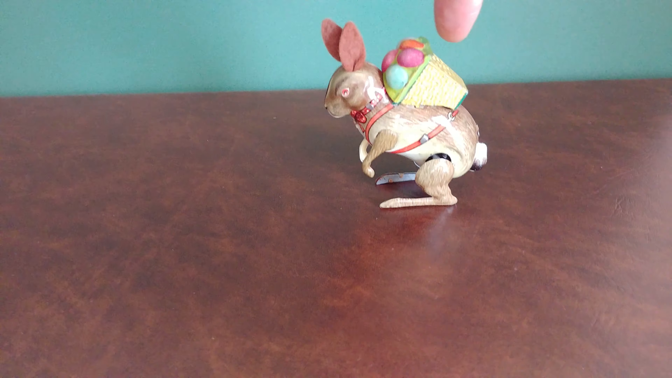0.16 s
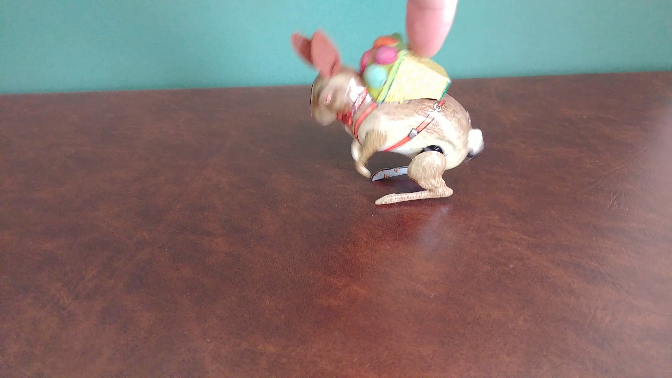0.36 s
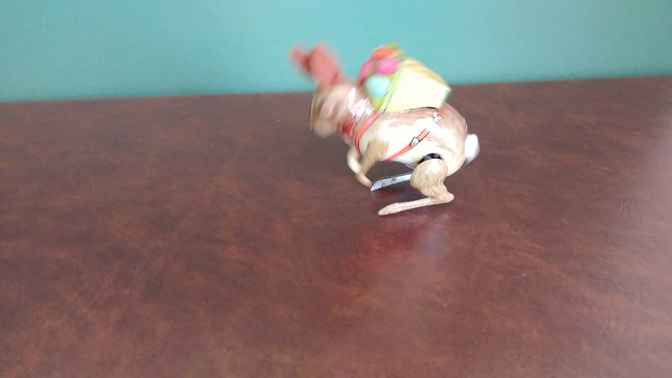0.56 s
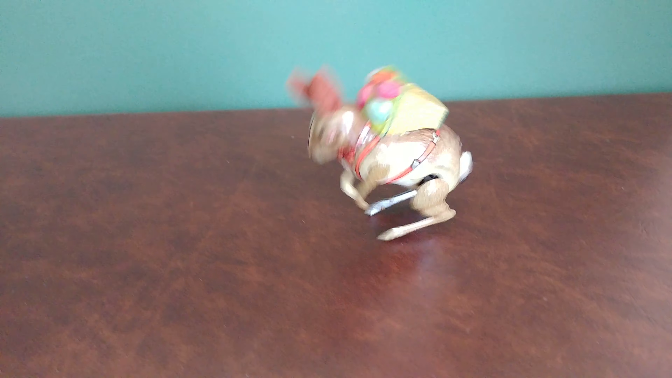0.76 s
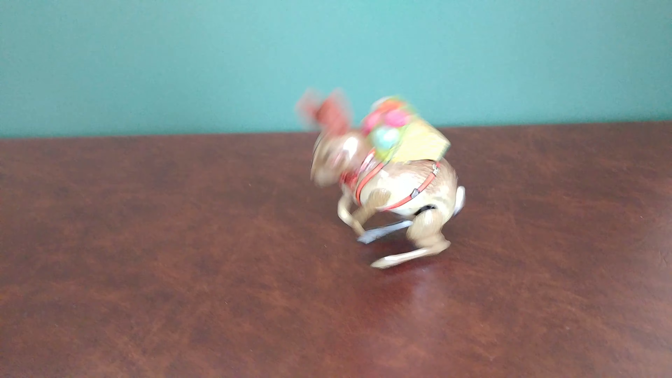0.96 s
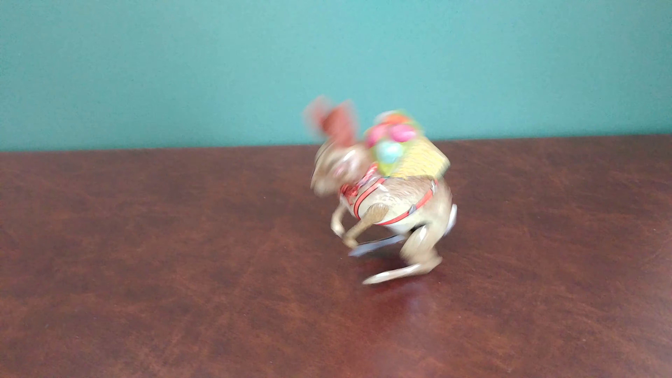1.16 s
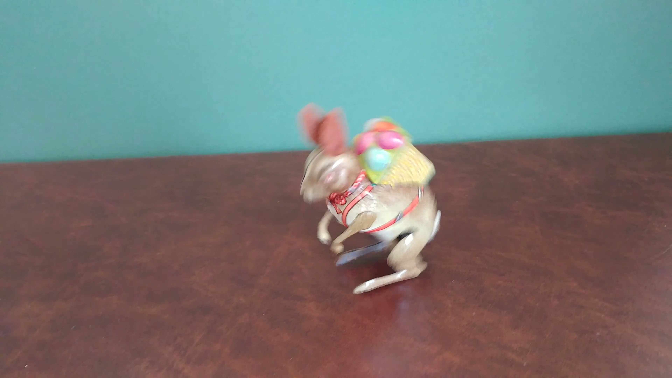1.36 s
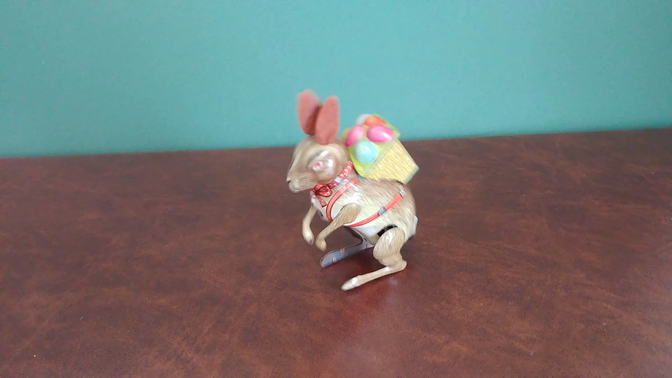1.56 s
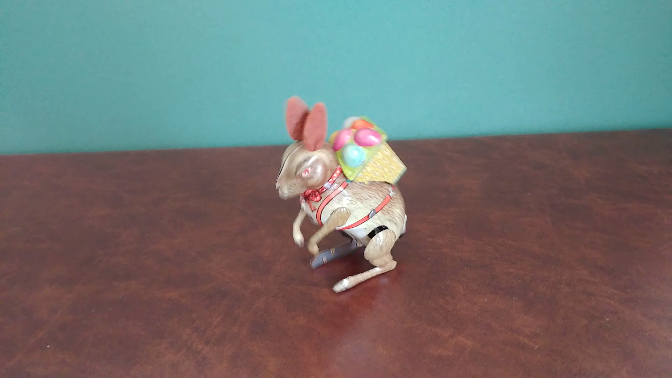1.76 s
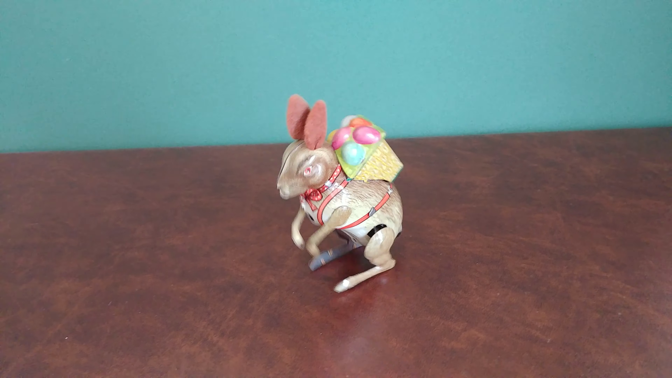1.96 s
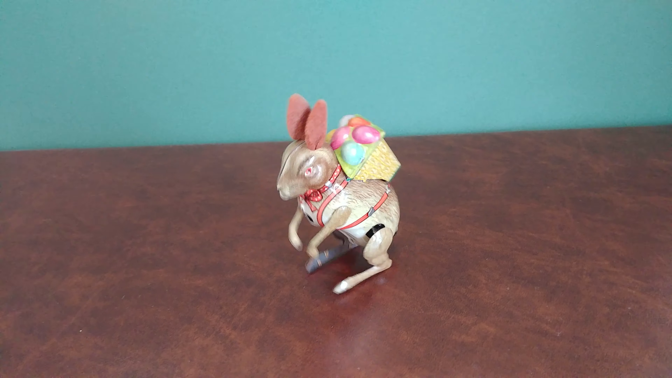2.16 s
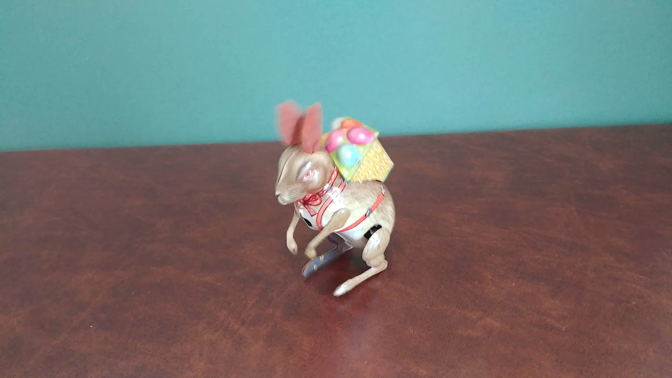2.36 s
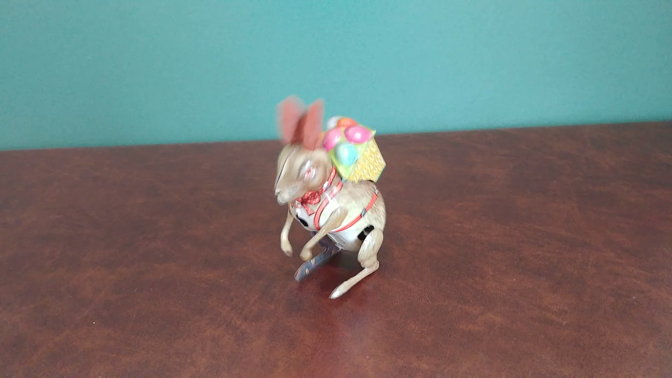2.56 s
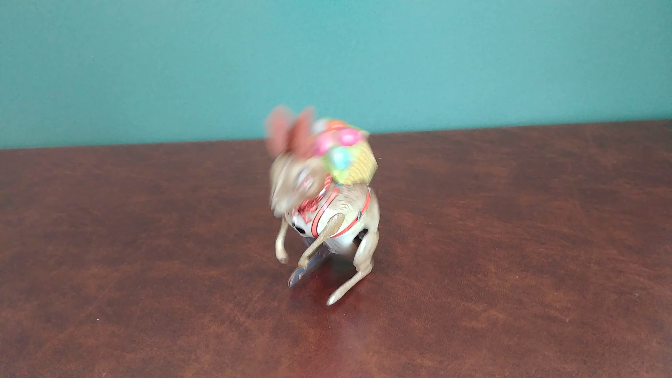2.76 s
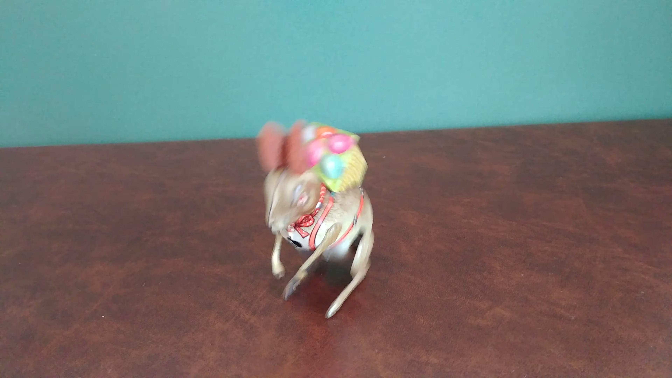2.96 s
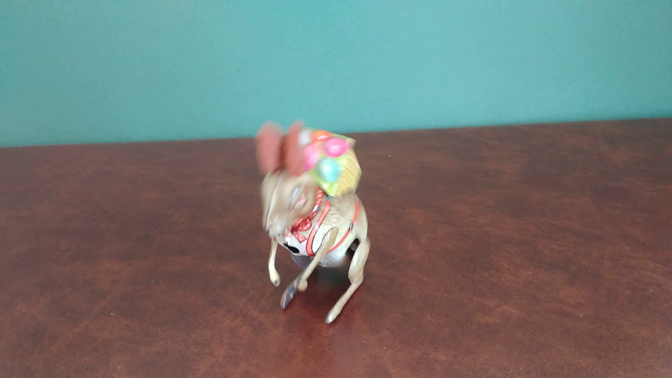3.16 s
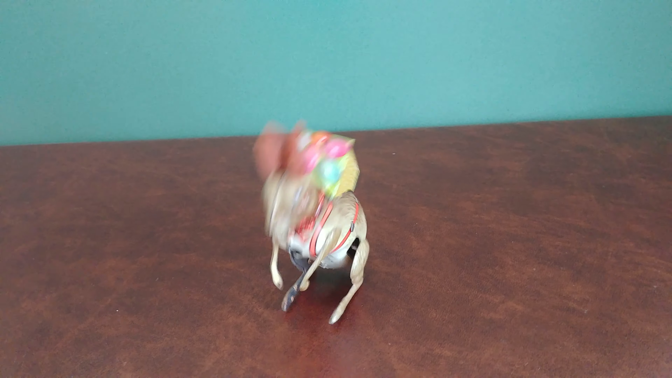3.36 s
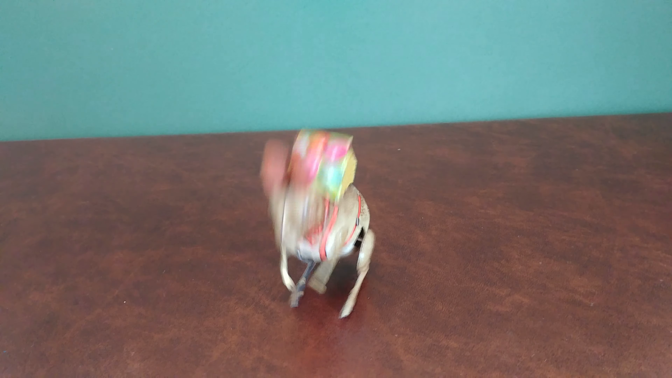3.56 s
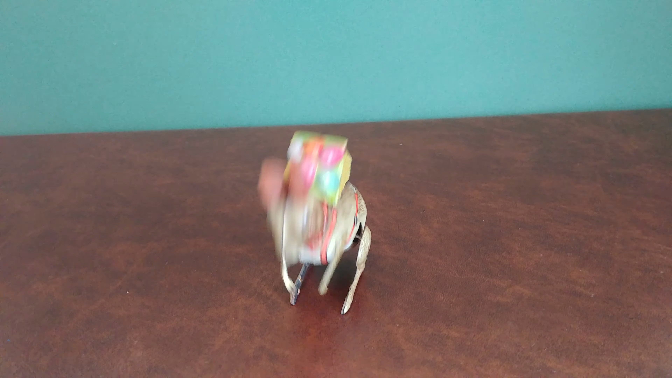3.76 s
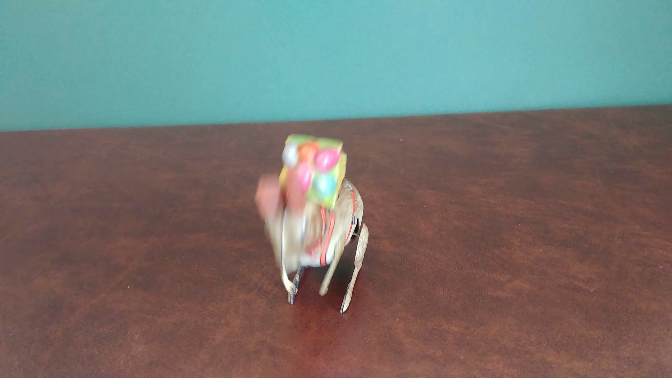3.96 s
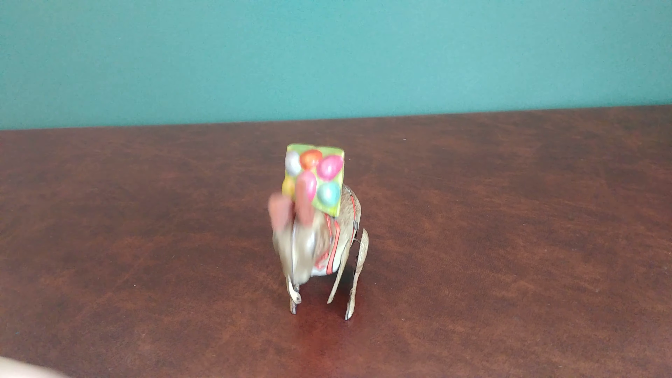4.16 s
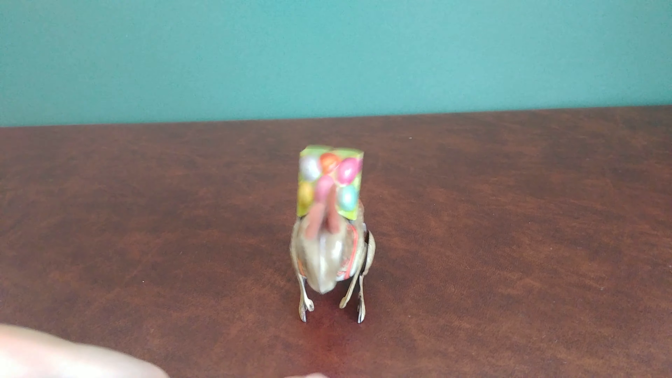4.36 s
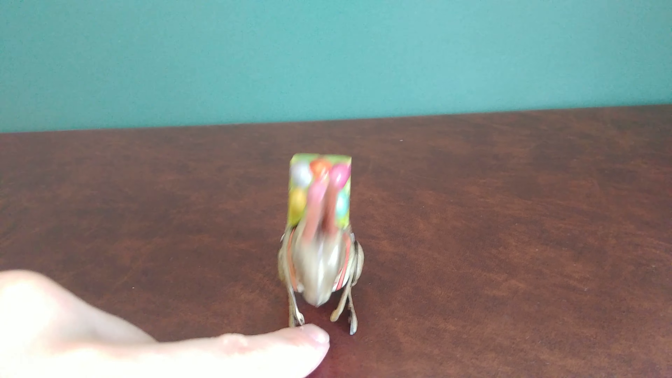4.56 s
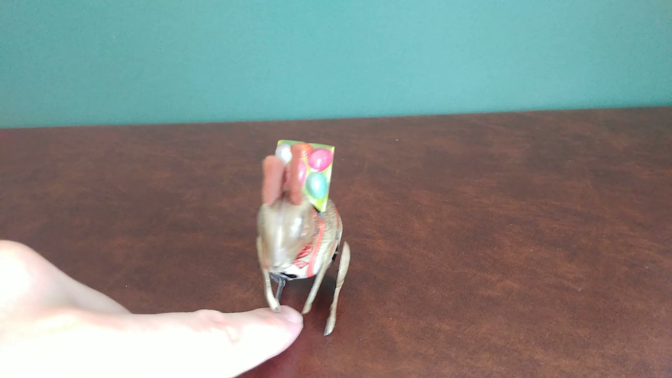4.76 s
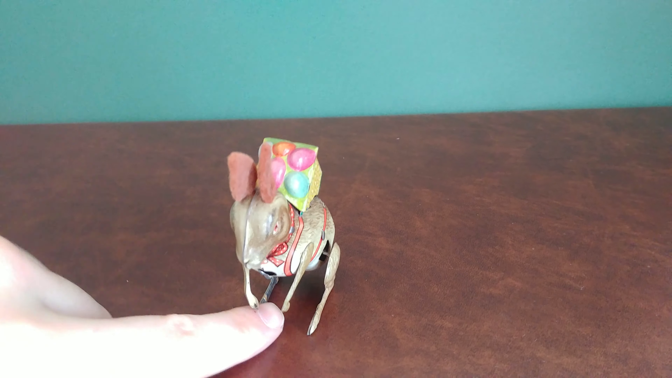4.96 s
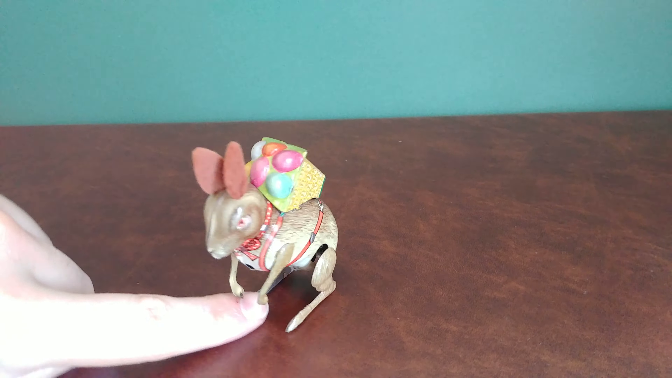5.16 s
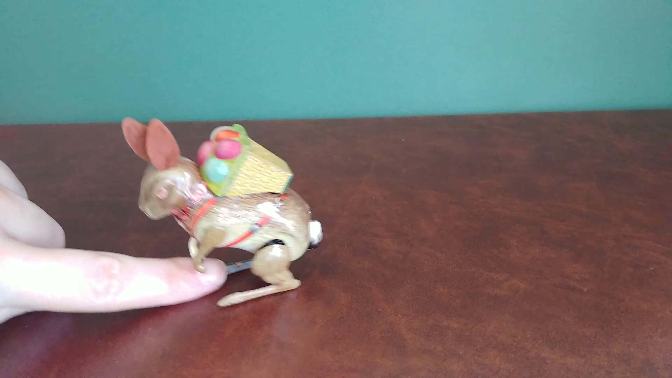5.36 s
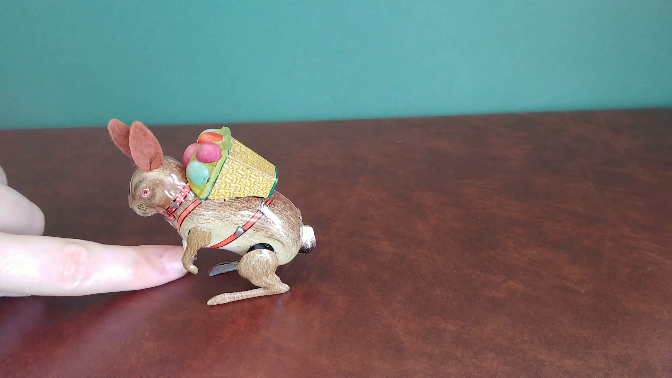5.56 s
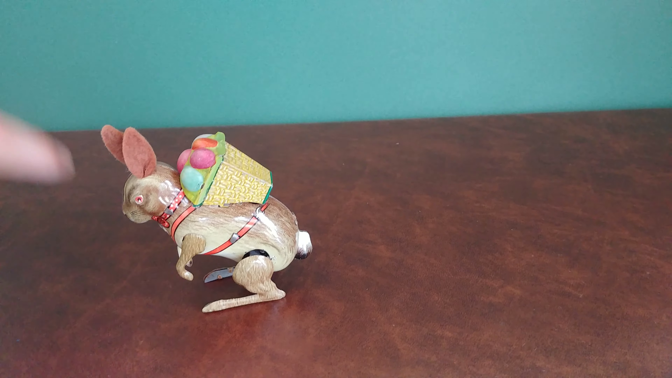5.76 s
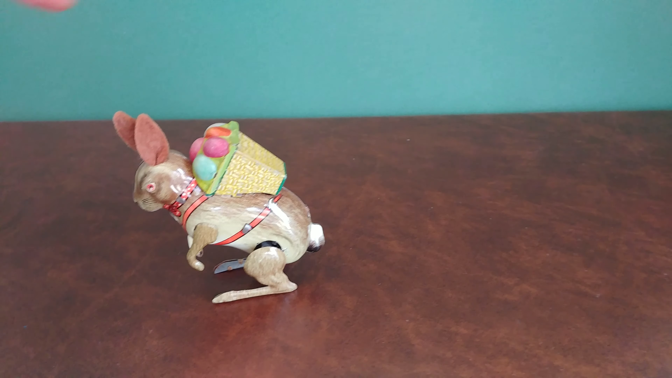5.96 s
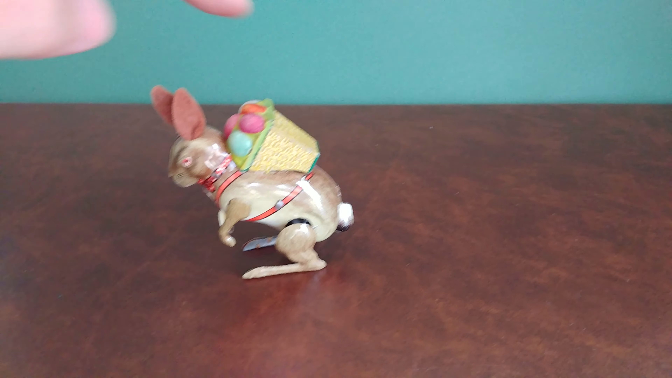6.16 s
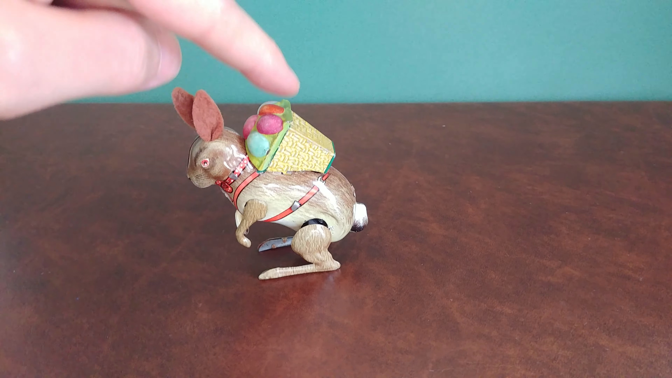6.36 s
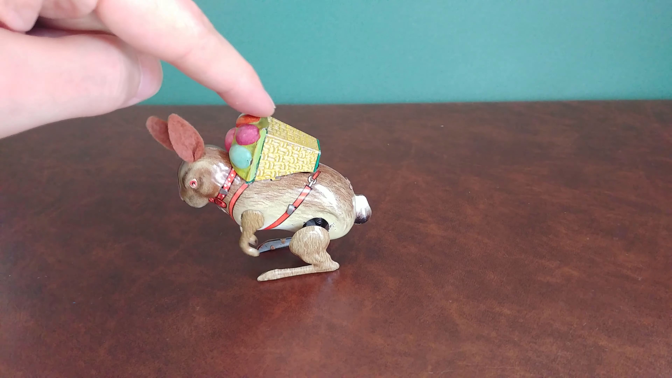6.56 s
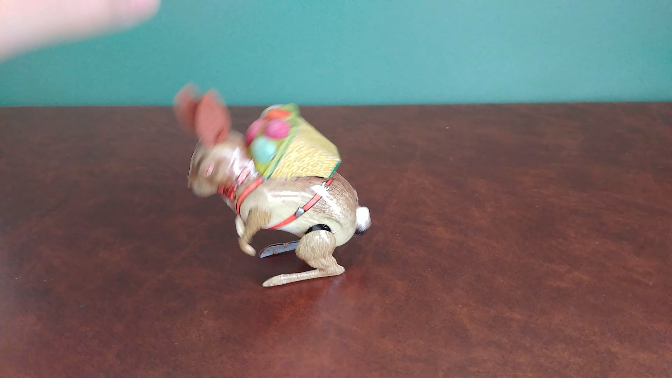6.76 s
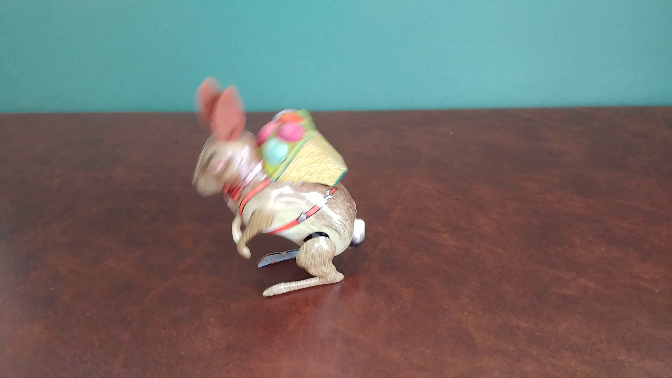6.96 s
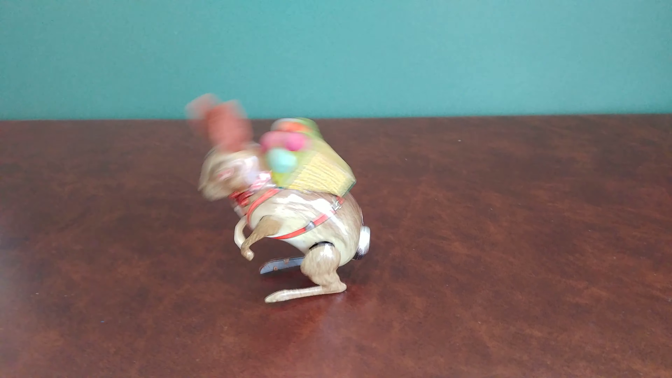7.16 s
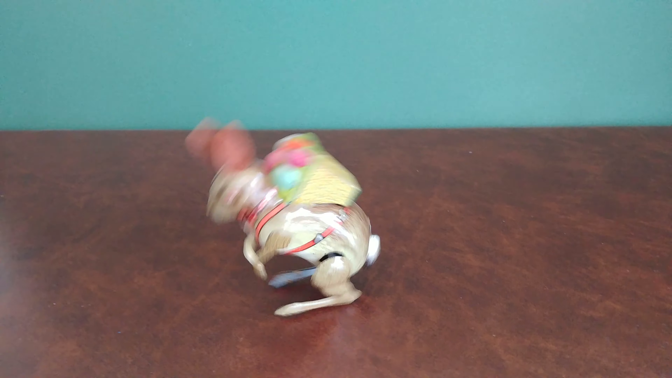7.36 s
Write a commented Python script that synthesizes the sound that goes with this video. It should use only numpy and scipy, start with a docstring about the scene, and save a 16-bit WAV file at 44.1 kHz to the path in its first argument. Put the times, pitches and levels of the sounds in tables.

```python
"""A clockwork tin rabbit hops over a wooden table, about five hops a second, close to a stereo microphone.
Each hop is two clacks of shaped noise and ringing modes: the spring kicks the legs, then the toy lands,
knocks the table with a low falling thump and rocks on its feet.
A finger stops it, slides it round with a scrape of tiny slips and later lets it go again.
Behind it lie a small room's noise-built tails and a steady bed of filtered noise."""
import sys
import numpy as np
from scipy import signal
from scipy.fft import rfft, irfft
from scipy.io import wavfile
from scipy.ndimage import uniform_filter1d

SR = 44100
rng = np.random.default_rng(int(sys.argv[2]) if len(sys.argv) > 2 else 0)


def wav_record(signal):
    """Record a signal, one row per channel, as 16-bit PCM in the file named by sys.argv[1]."""
    frames = np.transpose(np.atleast_2d(signal))
    bounded = np.clip(frames, -1, 1)
    # unit amplitude maps onto the largest positive 16-bit level
    quanta = np.round(bounded * 32767).astype(np.int16)
    wavfile.write(sys.argv[1], SR, quanta)


N = 326781


def rabbit():
    """The whole toy: kicks, landings, small ticks and clinks, each with its room tail."""
    return kicks() + landings() + ticks() + clinks()


# The spring kicks the legs: t/s, level/dB, looseness of the joints/dB
KICKS = [(0.34, -21.5, -9), (0.5456, -25.5, -11.5), (0.735, -25.5, -0.5), (0.932, -26, -0.5),
         (1.118, -25.5, 5), (1.3064, -22.5, -13), (1.4854, -23, -12), (1.69, -24.5, -7), (1.8875, -25, -12),
         (2.0847, -27.5, 2.5), (2.2935, -29.5, 2), (2.496, -27, -1), (2.7049, -28, -3), (2.9069, -27, -4.5),
         (3.1122, -25.5, 2.5), (3.3203, -29, -2.5), (3.5298, -29.5, 4), (3.747, -29.5, 6.5),
         (3.9566, -28.5, 4), (4.1692, -29, 10), (4.38, -28, 0), (4.6008, -29, 2), (6.5692, -25.5, -3),
         (6.8542, -29, 4), (7.1068, -29, 6), (7.3244, -27.5, -5)]
# Tint of the kicks, one row per spot: hollow/dB, clank/dB, bright/dB, sizzle/dB
KICK_TINT = [(1, -2, -0.5, -2), (2, -5.5, -1.1, 0), (2, -9, -3, -2)]


def kicks():
    """The spring throws the legs out: a clack of tin before each landing."""
    out = np.zeros((2, N))
    for s, level, loose in KICKS:
        blow = draw_blow(s, level, loose, at_spot(s, KICK_TINT), pan_db=3.6, ping_db=-9)
        add(out, s, room(clack(blow, shell_db=38.5, modes_db=3.0)))
    return out


# The toy lands and rocks back: t/s, level/dB, looseness of the joints/dB, table thump/dB,
# rocking/dB relative to the level
LANDINGS = [(0.41, -20, -1, -36.5, -14), (0.5987, -20.5, 6, -42, -14), (0.791, -20.5, 5, -41, -7),
            (0.987, -20.5, 6.5, -41, -11), (1.1758, -19.5, 5.5, -47, -8), (1.3653, -21, 7.5, -44, -3.5),
            (1.5467, -21.5, 4.5, -47, -8), (1.7436, -21.5, 17, -41, -6), (1.942, -21, 1, -44, -11.5),
            (2.143, -20.5, 0.5, -40, -11), (2.3533, -21.5, -1.5, -27.5, -10.5),
            (2.5571, -23, 4, -43.5, -11), (2.769, -23, 3, -43, -11), (2.969, -22.5, 14, -45, -3.5),
            (3.168, -23.5, 10, -24.5, -4.5), (3.377, -24.5, 2, -26, -12.5), (3.5901, -22.5, -3.5, -21, -10),
            (3.808, -23.5, 1, -23.5, -14.5), (4.02, -24, 6, -18.5, -6.5), (4.2327, -24.5, 15.5, -24, -11.5),
            (4.445, -25, 5, -48, -7), (4.663, -25, 3, -42.5, -14), (6.6863, -23.5, 10, -42, -13.5),
            (6.9143, -23.5, 8, -34.5, -13), (7.1677, -22.5, 7, -39, -10.5), (7.385, -24.5, 2, -54, -15)]
# Tint of the landings, one row per spot: hollow/dB, clank/dB, bright/dB, sizzle/dB
LANDING_TINT = [(1, 0.084, 0, 0), (3.5, 1.95, 2.5, 3), (-0.5, 1.3, 2.5, 4)]


def landings():
    """The feet strike the table: a clack of tin, then loose parts rattle."""
    out = np.zeros((2, N))
    for s, level, loose, *_ in LANDINGS:
        blow = draw_blow(s, level, loose, at_spot(s, LANDING_TINT), pan_db=3.0, ping_db=-2.0)
        add(out, s, room(clack(blow, shell_db=37.0, modes_db=2.0) + rattle(blow)))
    return out


# Small ticks while the finger holds the toy: t/s, level/dB
TICKS = [(4.7487, -62), (4.9352, -56)]
# Tint of the ticks: hollow/dB, clank/dB, bright/dB, sizzle/dB
TICK_TINT = (-13, -9, 5.5, 2)


def ticks():
    """The held toy ticks: small clacks with little low body."""
    out = np.zeros((2, N))
    for s, level in TICKS:
        blow = draw_blow(s, level, loose=3, tint=TICK_TINT, pan_db=4, ping_db=-13)
        add(out, s, room(clack(blow, shell_db=37.0, modes_db=-5.0)))
    return out


# A loose tab clinks late after a few landings: t/s, level/dB
CLINKS = [(0.439, -29), (2.208, -27.5), (2.801, -23.5), (4.478, -34)]


def clinks():
    """The loose tab's late clinks, each with its room tail."""
    out = np.zeros((2, N))
    for s, db in CLINKS:
        add(out, s, room(clink(db)))
    return out


def clink(db, hz=2620, rise_s=0.0027, t60_s=.04):
    """A loose tab swings back against the shell, rings one note and damps it at once."""
    t = np.arange(SR // 8) / SR
    return amp(db) * ring(t, hz, t60_s) * (1 - np.exp(-t / rise_s)) * np.ones((2, 1))


def draw_blow(s, level, loose, tint, pan_db, ping_db, tint_scatter_db=0.83, ping_scatter_db=3):
    """No two blows are alike: tint and spring ping scatter by chance."""
    chance = rng.standard_normal(5)
    hollow, clank, bright, sizzle = tint + tint_scatter_db * chance[:4]
    ping = level + ping_db + ping_scatter_db * chance[4]
    # s in seconds, all the rest in dB; pan is left over right
    return dict(s=s, level=level, hollow=hollow, clank=clank, bright=bright, sizzle=sizzle,
                pan=pan_db, loose=loose, ping=ping)


# Where the toy stands on the table: t/s, spot 0-2
SPOT = [(2.2, 0), (3.1, 1), (4.7, 1), (6.5, 2)]


def at_spot(s, per_spot):
    """Blends the three rows of a table by where the toy stands at time s."""
    spot = np.interp(s, *np.transpose(SPOT))
    return [np.interp(spot, range(3), column) for column in np.transpose(per_spot)]


def clack(blow, shell_db, modes_db, ping_hz=15207, ping_t60_s=.1, size=8192):
    """One blow: the crash of the shell, its longer rings and the short ping of the spring."""
    t = np.arange(size) / SR
    tin = amp(shell_db) * crash(t, blow) + amp(modes_db) * rings(t, blow["s"])
    hz = ping_hz + 10 * rng.standard_normal()
    spring = amp(blow["ping"]) * ring(t, hz, ping_t60_s, rng.random((2, 1)))
    return (amp(blow["level"]) * tin + spring) * amp([[blow["pan"] / 2], [-blow["pan"] / 2]])


# Colour of a clack: f/Hz, level/dB per Hz
SHELL = [(90, -24.5), (330, -9), (600, -13.5), (1300, -12), (2100, -5.5), (3900, 1.5), (6400, 4.5),
         (8100, 4.5), (9600, -5.5), (10700, -16.5), (12900, -3), (14600, -4), (15650, 2), (16200, -18.5)]


def crash(t, blow, same=0.7, lead_s=.00006, wander=0.43,
          patch_db=2, patch_hz=240, twist=1.0, twist_hz=700):
    """The dense, short-lived modes of thin sheet tin, as shaped noise; each blow favours other ones."""
    hz = np.fft.rfftfreq(len(t), 1 / SR)
    left, other = rng.standard_normal((2, len(t)))
    right = same * left + np.sqrt(1 - same ** 2) * other
    z = rfft(np.array([left, right]) * chatter(t, blow["loose"]))
    z *= causal(patch_db * ripple(hz, patch_hz))
    # so many modes share the blow that the broad colour stays steady
    power = (abs(z) ** 2).mean(0)
    broad_db = 10 * np.log10(uniform_filter1d(power, size=len(t) // 28) + 1e-12)
    tint = [(300, blow["hollow"]), (1000, blow["hollow"]), (2000, blow["clank"]), (3500, 0), (5200, 0),
            (7500, blow["bright"]), (13000, blow["sizzle"])]
    z *= causal(read(SHELL, hz) + read(tint, hz) - broad_db)
    # the left port is nearer, and each part of the shell radiates its own way
    lead = lead_s * (1 + wander * rng.standard_normal())
    turn = twist * ripple(hz, twist_hz) * hz / (hz + twist_hz)
    z[1] *= np.exp(1j * turn - 2j * np.pi * hz * lead)
    fade = np.minimum(t[::-1] / t[len(t) // 2], 1) ** 4
    return irfft(z) * fade


def chatter(t, loose_db, crack_s=0.0024, ring_s=0.017, ring_db=-8, bounce_s=.0045, bounce_db=-4,
            fade_s=0.0084, loose_share=0.95, contact_s=.0003):
    """Envelope of one clack: a hard contact, then loose tin joints strike again while the shell rings."""
    looseness = loose_share * loose_db
    delays = np.r_[0, bounce_s * np.cumsum(rng.uniform(.1, .9, size=5))]
    bounces = amp(bounce_db + looseness / 2) * rng.uniform(.4, 1.2, size=5)
    sizes = np.r_[1, bounces] * np.exp(-delays / fade_s)
    age = np.maximum(t - delays[:, None], 0)
    fall = np.exp(-age / crack_s) + amp(ring_db + looseness) * np.exp(-age / ring_s)
    rise = 1 - np.exp(-age / contact_s)  # tin on tin takes a moment to reach full force
    return np.linalg.norm(sizes[:, None] * fall * rise, axis=0)


def ripple(hz, width_hz):
    """A random wavy curve over frequency, of spread about 1."""
    return np.interp(hz / width_hz, np.arange(256), rng.standard_normal(256))


# Modes of the toy and the table top: f/Hz, t60/s, level/dB at the first, second and third spot
MODES = [(157.5, 0.12, -10.5, -5.5, -9), (261.2, .13, -15.5, -25.5, -41), (342.1, 0.11, -21, -10, -8),
         (508, 0.11, -16.5, -18.5, -33), (682.6, 0.06, -34, -9.5, -10.5), (923, 0.045, -11.5, -15.5, -16.5),
         (1609, 0.056, -10.5, -12.5, -26), (1838, 0.074, -21, -8, -5.5), (2620, .1, -9, -9, -4.5),
         (2920, .13, -12, -14, -16.5), (3110, .09, -15, -27, -39), (3930, 0.11, -11, -2.5, -4.5),
         (4300, .07, -11, -10, -14), (5200, 0.12, -7.5, -11, -11), (6500, 0.063, 1.5, -11.5, -1),
         (7630, .07, -7.5, -6, -8), (9820, .07, -16.5, -12.5, -20), (16600, 0.15, -9.5, -16.5, -13)]


def rings(t, s, scatter_db=3.0, detune=.009, build_cycles=2):
    """The longer modes; they shift a little as the legs fold and take a few cycles to build."""
    spot = np.interp(s, *np.transpose(SPOT))
    sound = np.zeros((2, len(t)))
    for hz, t60, *spot_db in MODES:
        db = np.interp(spot, range(3), spot_db) + scatter_db * rng.standard_normal((2, 1))
        # left and right phases drift apart towards the treble
        phase = rng.random() + rng.random((2, 1)) * min(hz / 3000, 1)
        shift = detune * min(hz, 4000) * rng.standard_normal()
        build = 1 - np.exp(-t * hz / build_cycles)
        sound += amp(db) * ring(t, hz + shift, t60, phase) * build
    return sound


def rattle(blow, rattle_db=16, first_s=0.023, last_s=0.086, fade_db_per_s=90, duller_db=8,
           count=3, size=2048):
    """After a landing, ears, basket and gears clink a few more times, softer and duller."""
    dull = {**blow, "sizzle": blow["sizzle"] - duller_db}
    t = np.arange(size) / SR
    out = np.zeros((2, 8192))
    for delay in rng.uniform(first_s, last_s, count):
        db = blow["level"] + rattle_db - fade_db_per_s * (delay - first_s)
        add(out, delay, amp(db) * crash(t, dull))
    return out


# From landing to rocking back, one row per spot: delay/s
ROCK_DELAY_S = [(.034,), (.028,), (.024,)]
# The hand bumps the table and presses the toy: t/s, level/dB
TOUCHES = [(4.831, -61), (6.411, -59.5), (6.47, -55.5)]


def table(kick_thump_db=-42, shudder_db=-24, after_rock_db=-15, late_s=0.0018):
    """Thumps, rocking and shudder carried by the table top; every kick thumps it equally."""
    out = np.zeros((2, N))
    for s, *_ in KICKS:
        add(out, s, jolt(kick_thump_db))
    for s, level, _, thump_db, rock_db in LANDINGS:
        add(out, s, jolt(thump_db))
        add(out, s, rumble(level + shudder_db))
        back = s + at_spot(s, ROCK_DELAY_S)[0] + late_s * rng.standard_normal()
        add(out, back, rock(level + rock_db))
        add(out, back, rumble(level + rock_db + after_rock_db))
    for s, db in TOUCHES:
        add(out, s, rumble(db))
    return out


def jolt(db, hz=76, swell_s=0.0054, snap=2.3, snap_s=0.0022, gain_db=10, left_db=-22, hard_db=-32,
         soft_slope=.5, edge_db=1, edge_s=.0004, edge_slope=0.91, size=4096):
    """A blow travels through the table and shakes the microphone; the right capsule picks up the thump."""
    t = np.arange(size) / SR
    turns = np.cumsum(hz * (1 + snap * np.exp(-t / snap_s))) / SR  # stiff at first contact, then slower
    thump = swell(t, swell_s) * np.sin(2 * np.pi * turns)
    # the harder the blow, the more its sharp knock stands out
    edge = (1 - t / edge_s) * np.exp(-t / edge_s) * np.minimum(t / edge_s, 1)
    thump = thump - amp(edge_db + edge_slope * (db - hard_db)) * edge
    level_db = db + gain_db + soft_slope * min(db - hard_db, 0)  # blows below hard_db sink further
    return amp(level_db) * thump * amp([[left_db], [0]])


def rock(db, hz=152, swell_s=.011, gain_db=2, rattle_db=-9, rattle_s=0.0023, pan_db=4, rough=0.11):
    """The toy rocks on its sprung feet: a short low wobble and a faint rattle of tin."""
    t = np.arange(SR // 8) / SR
    noise = rng.standard_normal((2, len(t)))
    creak = unit(band(noise, 90, 450))
    tone = np.sin(2 * np.pi * hz * rng.uniform(0.89, 1.05) * t)
    wobble = swell(t, swell_s) ** 2 * (tone + rough * creak)
    tin = amp(rattle_db) * unit(band(noise, 2000, 8500)) * swell(t, rattle_s)
    return amp(db + gain_db) * (wobble + tin) * amp([[pan_db / 2], [-pan_db / 2]])


def rumble(db, low_hz=55, high_hz=190, swell_s=0.021):
    """The table top goes on shuddering as the toy settles: a swell of low noise."""
    t = np.arange(SR // 5) / SR
    noise = band(rng.standard_normal(len(t)), low_hz, high_hz)
    return amp(db) * unit(noise) * swell(t, swell_s) * np.ones((2, 1))


# Colour of the scraping feet and clockwork: f/Hz, level/dB per Hz
SCRAPE_COLOUR = [(300, -29), (1800, -2), (2800, 0.5), (8000, 2.5), (10500, -23.5), (14500, -15),
                 (16000, -19)]
# The finger drags the toy: start t/s, end t/s, level/dB at the end
STROKES = [(0.261, .335, -53.5), (4.783, 5.466, -59.5)]


def scrape(grains_per_s=2500, spread_db=3, lumps_per_s=62, lumps_db=4, ring_db=-26):
    """Tiny slips of tin under the finger come in uneven bunches and faintly ring the shell."""
    t = np.arange(N) / SR
    slips = (rng.random((2, N)) < grains_per_s / SR) * rng.choice([-1, 1], (2, N))
    lumps = np.interp(t * lumps_per_s, np.arange(512), rng.standard_normal(512))
    sizes_db = spread_db * np.minimum(rng.exponential(1, (2, N)), 4)
    slips = slips * amp(sizes_db + lumps_db * lumps)
    shell = sum(ring(t[:4096], hz, t60) for hz, t60, *_ in MODES if hz > 2000) / 10
    slips = slips + amp(ring_db) * signal.oaconvolve(slips, shell[None])[:, :N]
    return unit(coloured(slips, SCRAPE_COLOUR)) * sum(stroke(t, *row) for row in STROKES)


def stroke(t, start, end, db, swell_db=13, steepness=2.0, attack_s=0.016, release_s=.025):
    """Envelope of one drag: the finger pushes harder and harder, then lets go."""
    push = np.clip((t - start) / (end - start), 0, 1) ** steepness
    attack = np.clip((t - start) / attack_s, 0, 1)
    release = np.exp(-np.maximum(t - end, 0) / release_s)
    return amp(db - swell_db * (1 - push)) * attack * release


# Decay of the room: f/Hz, t60/s
ROOM_T60 = [(120, 1), (400, 0.16), (1000, 0.17), (3000, 0.25), (7000, 0.24), (11000, 0.2653), (16000, 0.09)]
# Colour of its tail: f/Hz, level/dB
ROOM_DB = [(120, -2), (400, -6.5), (1000, -3), (3000, -5), (7000, -6.5), (11000, -7), (16000, 0)]


def room(sound, first_s=0.019, build_s=0.0089, size=20000):
    """A fresh diffuse tail of decaying noise for each blow; the lowest bass lingers, the top dies first."""
    hz, t, z = signal.stft(rng.standard_normal((2, size)), SR, nperseg=256)
    t60 = read(ROOM_T60, hz)[:, None]
    even_energy = np.sqrt(2 * np.log(1000) / (t60 * SR))  # a longer decay gets no extra energy
    decay = amp(-60 * t / t60) * even_energy
    tail = signal.istft(z * decay * amp(read(ROOM_DB, hz))[:, None], SR, nperseg=256)[1]
    tail *= np.clip((np.arange(tail.shape[1]) / SR - first_s) / build_s, 0, 1)
    tail[:, 0] = 1  # the direct sound
    return signal.fftconvolve(sound, tail, axes=1)


# Steady room noise: f/Hz, level/dB per Hz
AIR = [(15, -63.5), (25, -33.5), (102, 0), (145, -4.5), (217, -25), (242, -13.5), (363, -15.5), (405, -12),
       (476, -19.5), (516, -16.5), (911, -25), (1400, -27.5), (1610, -29.5), (2110, -29.5), (16000, -48)]


def air(level_db=-57.5, gain_db=2):
    """Low rumble and faint hiss of the room: filtered noise, a little louder on the left."""
    noise = unit(coloured(rng.standard_normal((2, N)), AIR))
    return amp(level_db + gain_db) * noise * amp([[1.5], [-1.5]])


def amp(db):
    """Decibels to gain."""
    return 10 ** (np.asarray(db) / 20)


def unit(x):
    """Scales to rms 1."""
    return x / np.sqrt(np.mean(x ** 2) + 1e-20)


def read(points, hz):
    """Reads a table on a log-frequency axis."""
    f, value = np.transpose(points)
    return np.interp(np.log(hz + 1), np.log(f + 1), value)


def add(mix, s, sound):
    """Mixes a stereo sound in at time s."""
    part = mix[:, round(s * SR):][:, :sound.shape[1]]
    part += sound[:, :part.shape[1]]


def coloured(x, points):
    """Filters a long sound by a dB spectrum."""
    return irfft(rfft(x) * amp(read(points, np.fft.rfftfreq(N, 1 / SR))), N)


def band(x, low_hz, high_hz):
    """Band-pass filter."""
    return signal.sosfilt(signal.butter(2, [low_hz, high_hz], "band", fs=SR, output="sos"), x)


def causal(db):
    """Minimum-phase response with the given dB gain per bin."""
    log_gain = np.log(amp(np.r_[db, db[-2:0:-1]]))
    return np.exp(np.conj(signal.hilbert(log_gain)))[:len(db)]


def swell(t, peak_s):
    """Rises to 1 at peak_s, then dies away."""
    return t / peak_s * np.exp(1 - t / peak_s)


def ring(t, hz, t60, turn=0):
    """One dying mode: a sine losing 60 dB in t60 seconds, started at a phase in turns."""
    return amp(-60 * t / t60) * np.sin(2 * np.pi * (hz * t + turn))


# Stereo width: f/Hz, level/dB of the side signal
WIDTH = [(60, -8.5), (150, -4.5), (400, -4.5), (800, 1), (1500, 1), (16000, -1)]


def scene():
    """The toy and the room plus the table; long waves in the air reach both ports nearly alike."""
    left, right = rabbit() + scrape() + air()
    mid = (left + right) / 2
    side = coloured((left - right) / 2, WIDTH)
    return np.array([mid + side, mid - side]) + table()


def record(dry, bass_hz=40, edge_hz=16250):
    """Bass roll-off, full-scale limit, then the band limit."""
    thin = signal.sosfilt(signal.butter(3, bass_hz, "high", fs=SR, output="sos"), dry)
    low_pass = signal.firwin(255, edge_hz, window=("kaiser", 8), fs=SR)
    return signal.oaconvolve(np.clip(thin, -1, 1), low_pass[None], "same")


dry = scene()
out = record(dry)
wav_record(out)
```